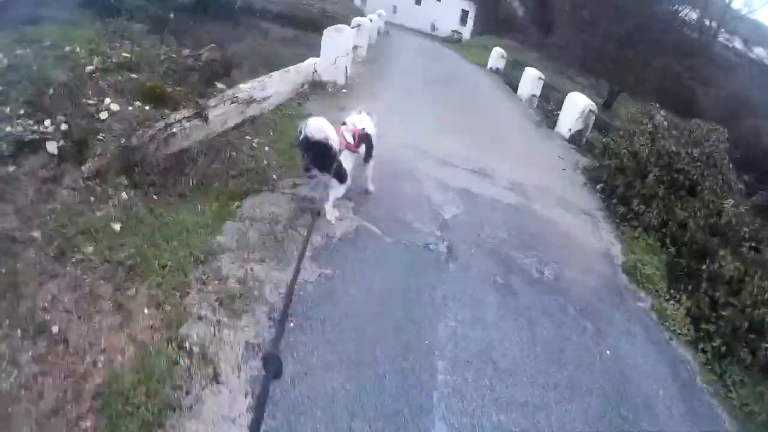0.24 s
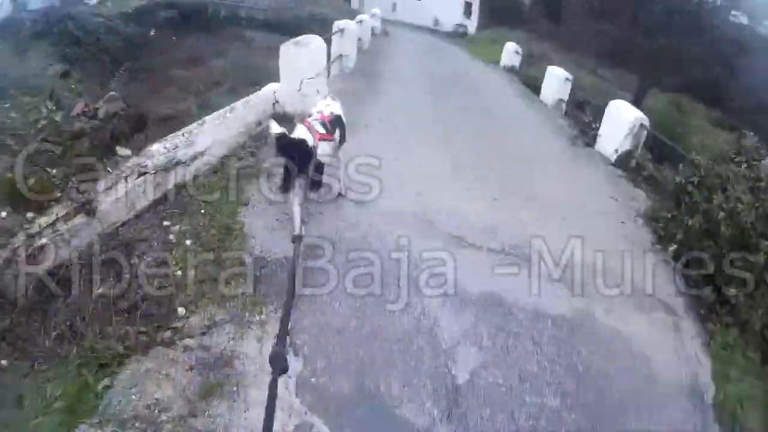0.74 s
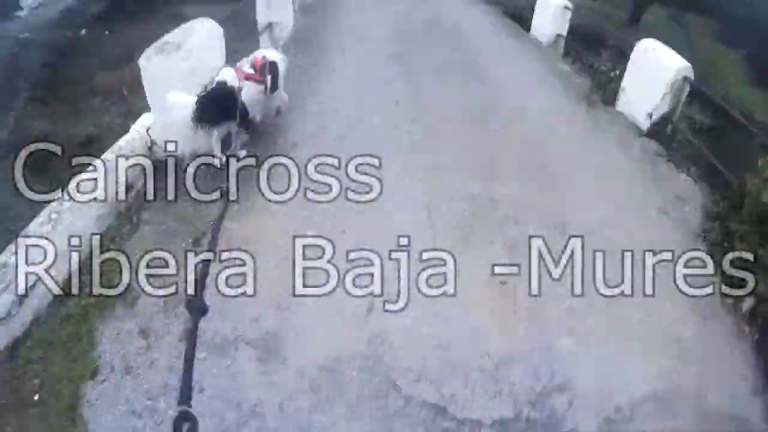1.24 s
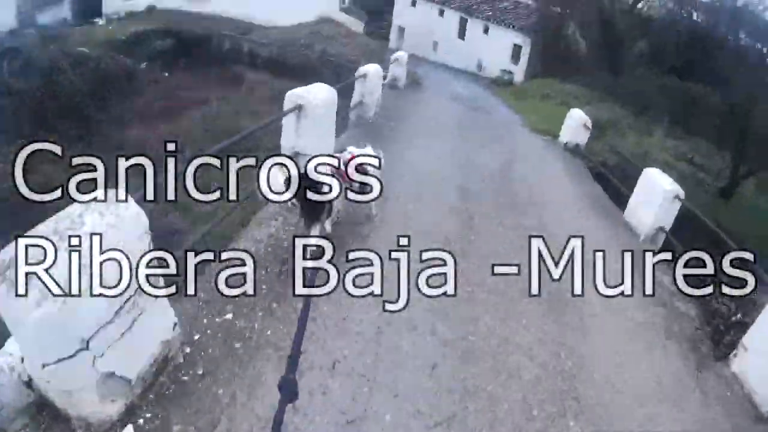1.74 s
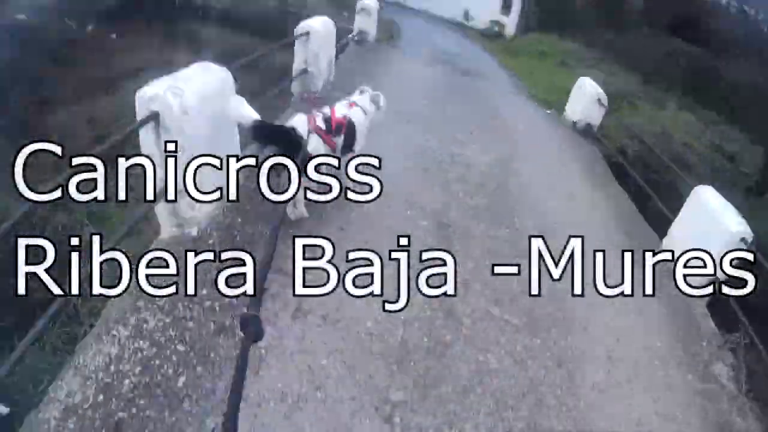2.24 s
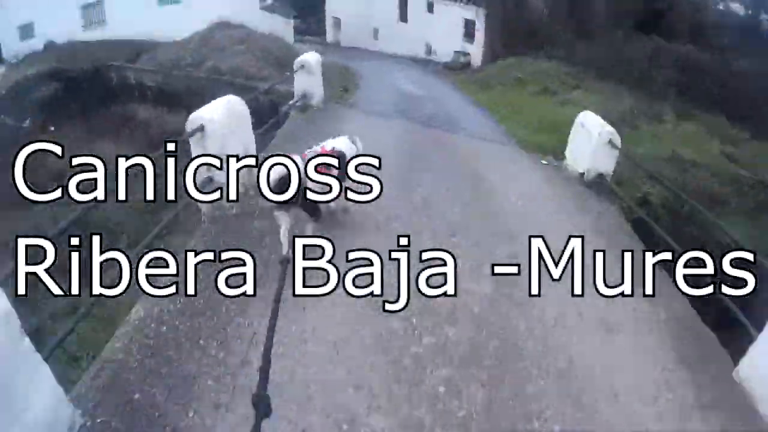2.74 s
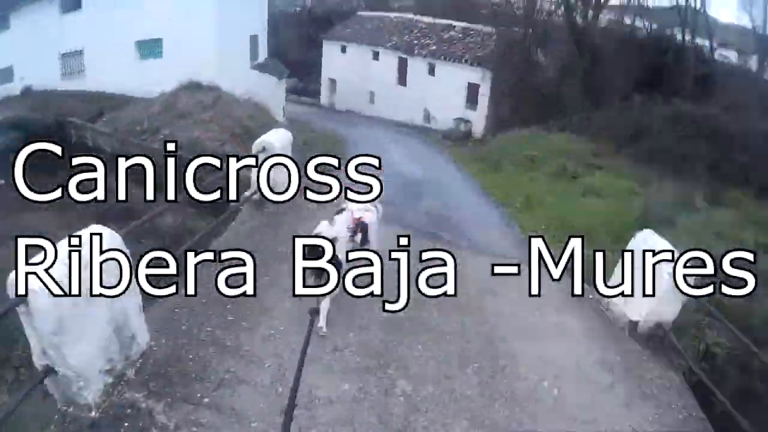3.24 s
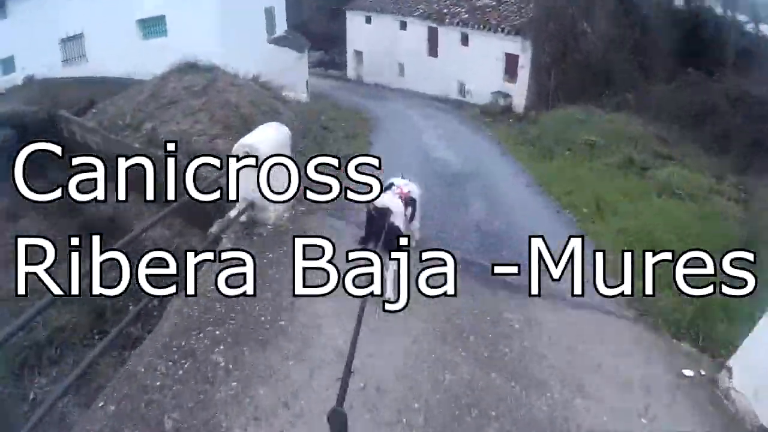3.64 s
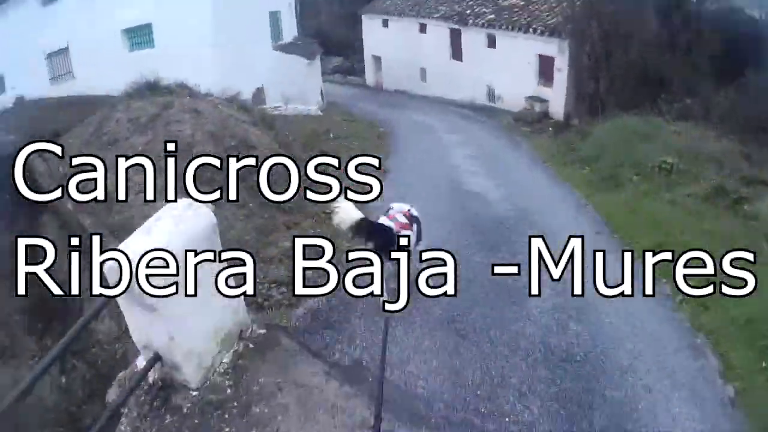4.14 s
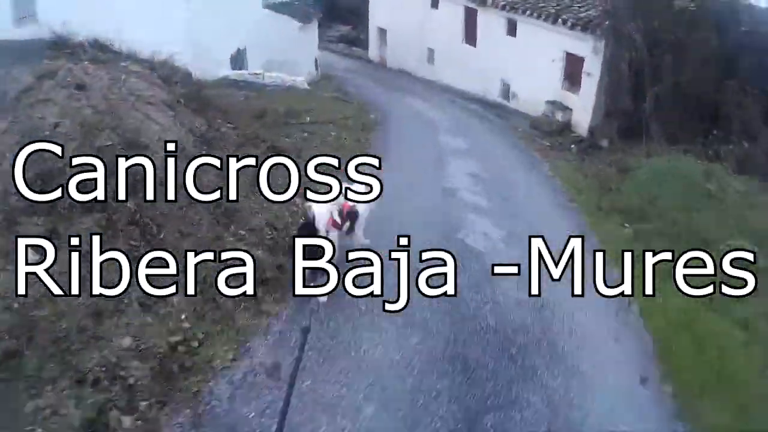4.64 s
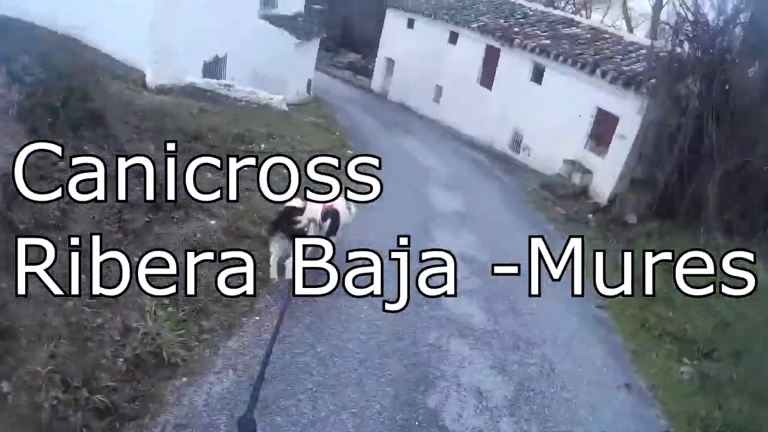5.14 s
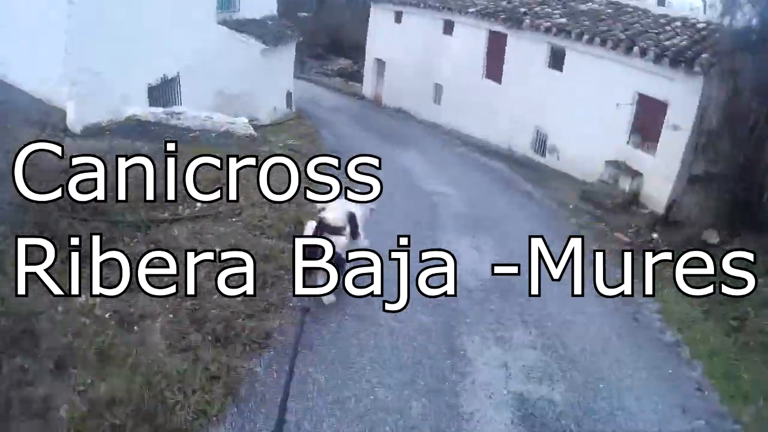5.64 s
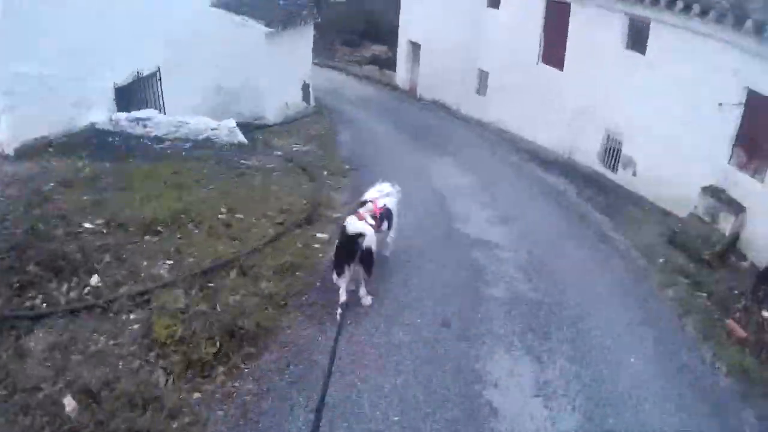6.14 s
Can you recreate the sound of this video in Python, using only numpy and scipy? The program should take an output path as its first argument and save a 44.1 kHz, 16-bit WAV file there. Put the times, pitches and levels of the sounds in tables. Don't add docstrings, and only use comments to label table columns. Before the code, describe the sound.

The opening is silent until roughly 0.2 seconds, when a very small, dull switch-on thump drains away almost at once. From about 0.3 seconds steady outdoor rain fades in, muffled at first and gaining treble until it reaches full but still quiet level near 2.5 seconds. A wide, distant hiss of countless drops fills both ears. In front lies a warmer near wash with dense tiny ticks, starting well left, crossing right by 1.8 seconds, leaning left again around 4.5 and ending slightly right. Sharp individual drops stand out, clustered between 0.4 and 1.7 seconds, then scattered more thinly. The rain holds evenly, with slight flickering. From about 5.3 seconds a gust shakes wet leaves, its bright rush growing until the cut at about 6.4 seconds. The stereo microphone sounds noise-reduced, with a softened, limited top.

```python
import sys
import numpy as np
from scipy import signal
from scipy.fft import rfft, irfft
from scipy.io import wavfile
from scipy.ndimage import uniform_filter1d

SR = 44100
rng = np.random.default_rng(int(sys.argv[2]) if len(sys.argv) > 2 else 0)


def pcm_store(signal):
    levels = np.round(np.clip(np.atleast_2d(signal), -1, 1) * 32767)
    wavfile.write(sys.argv[1], SR, levels.astype(np.int16).T)


def undo_db(level):
    steps = np.asarray(level, float) / 20
    return 10 ** steps


N = 281664
SWITCH_ON_S = 9998 / SR


def evened(x):
    return x / np.sqrt(np.mean(x ** 2) + 1e-20)


def read(points, hz):
    f, value = np.transpose(points)
    return np.interp(np.log(hz + 1), np.log(f + 1), value)


def placed(x, pan_db):
    left = undo_db(pan_db / 2) * np.ones(len(x))
    right = undo_db(-pan_db / 2) * np.ones(len(x))
    ears = np.array([left, right])
    return x * ears * np.sqrt(2 / (ears ** 2).sum(0))


def fade():
    start_s, rise_s = 0.27, 2.21
    progress = np.clip((np.arange(N) / SR - start_s) / rise_s, 0, 1)
    return np.sin(np.pi / 2 * progress)


def brightened(x):
    dull_db, dull_bend = -6, 0.58
    top = signal.filtfilt(*signal.butter(2, 5500, "high", fs=SR), x)
    top_gain = undo_db(dull_db * (1 - fade()) ** dull_bend)
    return x + (top_gain - 1) * top


def hiss(colour, patchy_db, flicker_db, channels):
    frames = N // 128 + 5
    patches = rng.standard_normal((frames, 257)).T
    patches = uniform_filter1d(patches, size=8, axis=0)
    patches = evened(uniform_filter1d(patches, size=24, axis=1))
    flicker = evened(uniform_filter1d(rng.standard_normal(frames), size=9))
    hz = np.fft.rfftfreq(512, 1 / SR)
    treble = (hz / (hz + 2500))[:, None]
    field = undo_db(patchy_db * patches + flicker_db * treble * flicker)
    white = rng.standard_normal((channels, frames * 128))
    white = signal.stft(white, nperseg=512, noverlap=384)[2][..., :frames]
    x = signal.istft(white * field, nperseg=512, noverlap=384)[1][:, :N]
    tilt = undo_db(read(colour, np.fft.rfftfreq(N, 1 / SR)))
    return evened(irfft(rfft(x) * tilt, N))


# f/Hz, level per Hz/dB
FAR_COLOUR = [(12, -35), (25, 0.5), (60, -12), (200, -11.5), (600, -7.5), (1400, -6), (3000, -3.5),
              (5000, -6.5), (6800, -7), (9000, -8.5), (12400, -14.5), (14000, -19), (15200, -21.5)]


def far():
    level_db, bend = -46, 1.06
    wash = hiss(FAR_COLOUR, patchy_db=1.1, flicker_db=0.7, channels=2)
    return undo_db(level_db) * fade() ** bend * brightened(wash)


# f/Hz, level per Hz/dB
GUST_COLOUR = [(500, -28), (1500, -18), (2900, -5), (4400, 0), (6500, -2.5), (9900, -7), (15000, -25)]


def gust():
    start_s, rise_s, bend, level_db = 5.33, 1, 2.3, -42
    rush = hiss(GUST_COLOUR, patchy_db=1.2, flicker_db=0.6, channels=2)
    wind = np.maximum(np.arange(N) / SR - start_s, 0) / rise_s
    return undo_db(level_db) * wind ** bend * rush


# t/s, level/dB
HEADING = [
    (.27, 12),
    (.4, 11),
    (.95, 2.5),
    (1.76, -3),
    (2.36, -5),
    (3.2, -1.4),
    (4.5, 3),
    (5.7, -1.5),
    (6.39, -2),
]


def heading():
    s, pan_db = np.transpose(HEADING)
    return np.interp(np.arange(N) / SR, s, pan_db)


def splat(hz, ring_s, crack, noise):
    t = np.arange(len(noise)) / SR
    share = np.clip(crack, 0, 1)
    lasts = ring_s * (1.3 - share)
    ring = -np.sin(2 * np.pi * hz * t) * np.sqrt(t / lasts) * np.exp(-t / lasts)
    spray = noise * (np.exp(-t / 0.0011) + 0.12 * np.exp(-t / 0.007))
    spray = spray - 2.2 * (np.arange(len(t)) == 3)
    edges_hz = [min(0.63 * hz, 4500), min(2.16 * hz, 11500)]
    spray = signal.lfilter(*signal.butter(2, edges_hz, "band", fs=SR), spray)
    return np.sqrt(1 - share) * evened(ring) + np.sqrt(share) * evened(spray)


def ticks():
    per_s = 420
    bunching = undo_db(4.5 * evened(uniform_filter1d(rng.standard_normal(N), size=1500)))
    falls = rng.random(N) < per_s / SR * bunching
    size = undo_db(3.7 * np.minimum(rng.exponential(1, N), 3.5)) * falls
    kind = rng.integers(0, 24, N)
    out = np.zeros(N)
    for k, hz in enumerate(np.geomspace(2800, 11500, num=24)):
        tick = splat(hz, 0.0004, 0.7, rng.standard_normal(600))
        out += signal.oaconvolve(size * (kind == k), tick)[:N]
    return evened(out)


# t/s, level at full rain/dB, ring f/Hz, crack share/0-1
DROPS = [(0.3534, -41, 6460, 0.37), (0.4162, -29, 4700, 0.16), (0.5252, -27.5, 3960, 0.3),
         (0.594, -38, 10000, 0.7), (0.6402, -41, 11000, 0.63), (0.8144, -32, 6030, 0.7),
         (0.842, -24.5, 4200, 0.83), (0.9871, -42, 8200, 0.5), (0.8557, -27, 5170, 0.75),
         (0.8953, -34, 6460, 0.45), (1.301, -38, 8440, 0.46), (1.3061, -31.5, 5170, 0.7),
         (1.3417, -36, 8350, 0.67), (1.422, -33.5, 8100, 0.5), (4.8921, -34, 5680, 0.44),
         (1.6514, -28.5, 3250, 0.12), (2.2603, -36, 5500, 0.6), (2.4146, -32, 9820, 0.6),
         (2.5188, -36, 7410, 0.7), (2.9224, -32, 3360, 0.7), (3.0438, -35, 6630, 0.6),
         (3.1955, -33, 4600, 0.4), (3.3026, -36, 9300, 0.4), (3.574, -32, 6700, 0.51),
         (3.643, -32, 3900, 1), (4.4172, -34, 6370, 0.65), (4.7317, -33.5, 8870, 0.59),
         (5.352, -35, 8350, 0.56), (5.2708, -32, 3900, 0.8), (6.1659, -41, 4390, 0.7)]


def drops():
    out = np.zeros(N)
    noise = rng.standard_normal((len(DROPS), 600))
    for (s, db, hz, crack), z in zip(DROPS, noise):
        at = round(s * SR)
        out[at:at + 600] += undo_db(db - 15.5) * splat(hz, 0.00038, crack, z)
    return placed(fade() * out, 1.3 * heading())


# f/Hz, level per Hz/dB
NEAR_COLOUR = [(12, -36), (25, -8), (60, -3), (150, -4.5), (270, -0.5), (650, -2), (1300, -4.5), (2800, -9),
               (6000, -17), (10000, -24.5), (13500, -25), (15200, -29)]


def patter():
    level_db, bend, ticks_db = -48.5, 0.94, -8
    level = undo_db(level_db) * fade() ** bend
    pan_db = heading()
    wash = brightened(hiss(NEAR_COLOUR, patchy_db=1.0, flicker_db=2.5, channels=1)[0])
    return placed(level * wash, pan_db) + placed(level * undo_db(ticks_db) * ticks(), 1.3 * pan_db)


def scene():
    return far() + gust() + drops() + patter()


def thump():
    level_db, drain_s = -41, 0.0105
    t = np.arange(N) / SR - SWITCH_ON_S
    step = undo_db(level_db) * np.exp(-np.maximum(t, 0) / drain_s) * (t >= 0)
    return signal.filtfilt(*signal.butter(4, 10500, fs=SR), step)


def gated(x, depth):
    turn = np.array([[1, 1], [1, -1.025]]) / np.sqrt(2)
    hz, _, z = signal.stft(turn @ x, SR, nperseg=2048, noverlap=1536)
    power = abs(z) ** 2 + 1e-20
    near = uniform_filter1d(uniform_filter1d(power, size=4, axis=1), size=3, axis=2)
    around = uniform_filter1d(power, size=31, axis=1)
    strength = (depth * np.sqrt(hz / 8000))[:, None]
    gain = np.minimum(near / around / 0.65, 1) ** strength
    return turn @ signal.istft(z * gain, SR, nperseg=2048, noverlap=1536)[1][:, :N]


def top_cut(x):
    return signal.sosfilt(signal.butter(12, 15700, fs=SR, output="sos"), x)


def record(dry):
    switched_on = np.arange(N) / SR - SWITCH_ON_S >= 0
    heard = gated(dry, depth=1.1) * switched_on + thump()
    edge = signal.firwin(1501, 15040, window=("kaiser", 9), fs=SR)
    limited = signal.oaconvolve(heard, edge[None], "same", axes=1)
    return top_cut(limited)


dry = scene()
out = record(dry)
pcm_store(out)
```